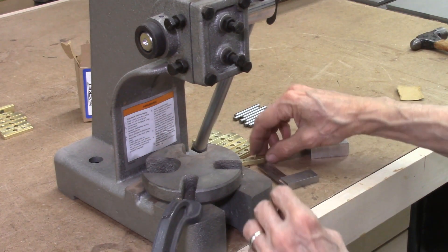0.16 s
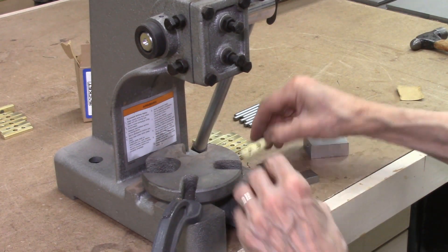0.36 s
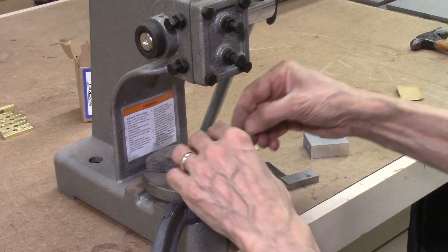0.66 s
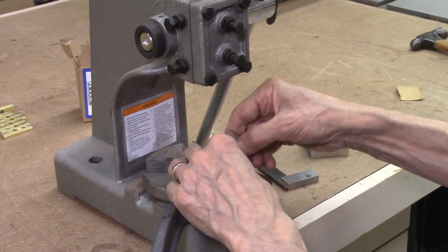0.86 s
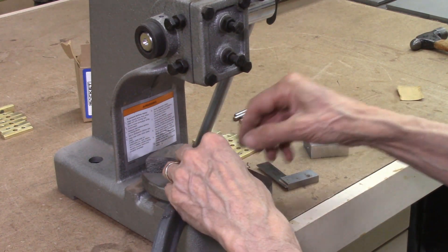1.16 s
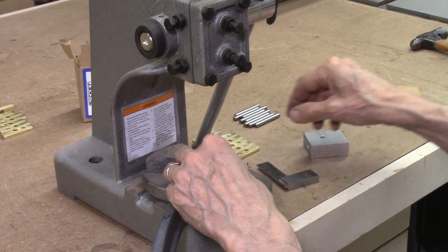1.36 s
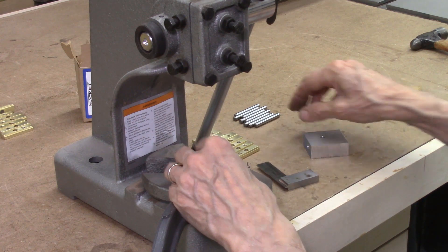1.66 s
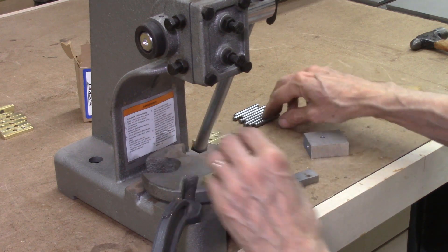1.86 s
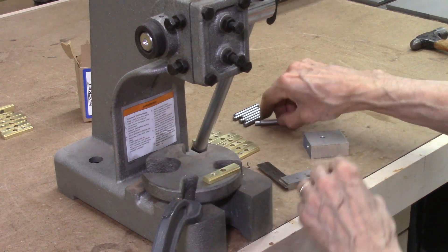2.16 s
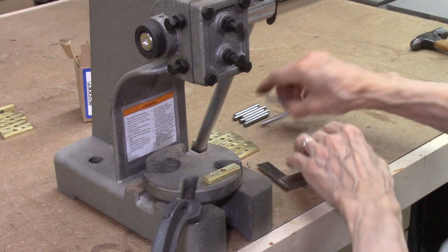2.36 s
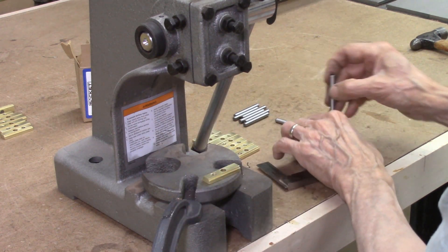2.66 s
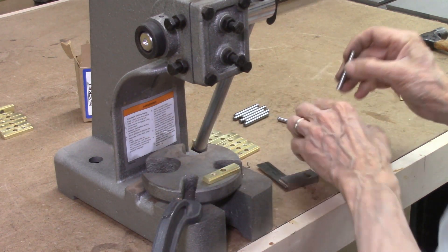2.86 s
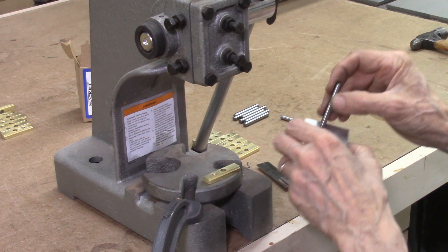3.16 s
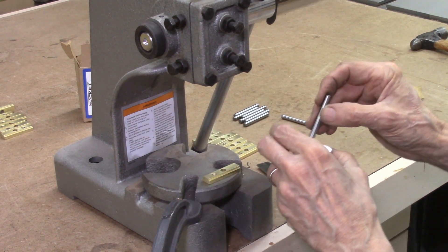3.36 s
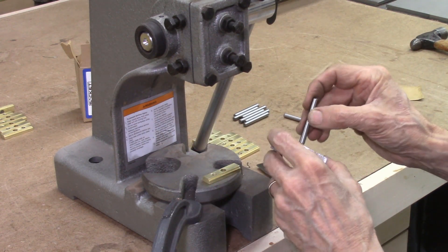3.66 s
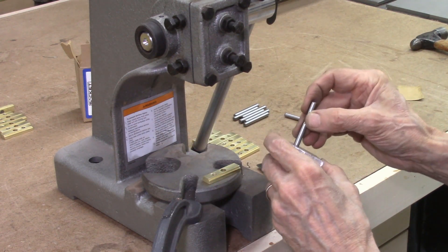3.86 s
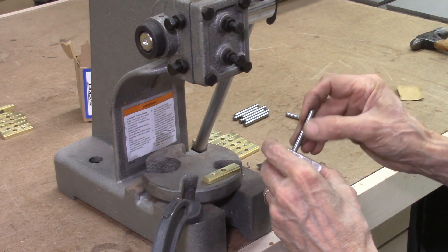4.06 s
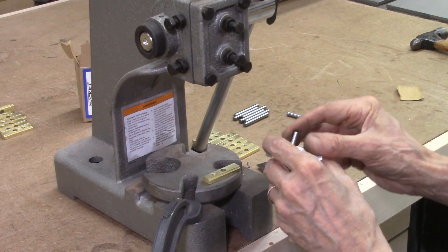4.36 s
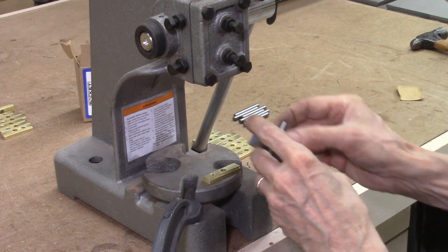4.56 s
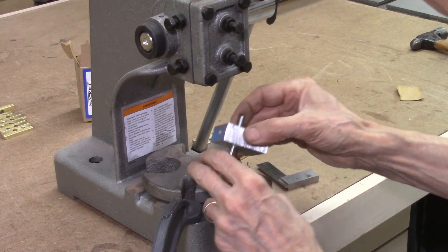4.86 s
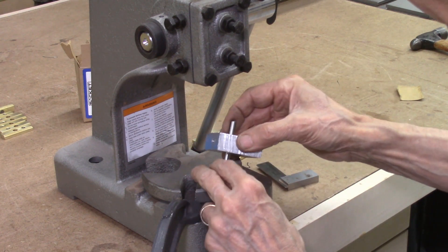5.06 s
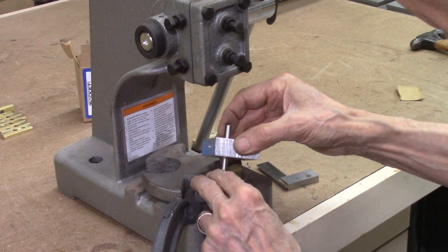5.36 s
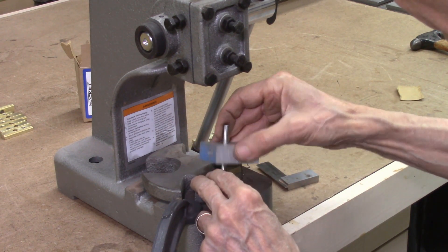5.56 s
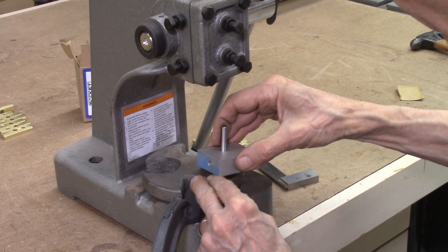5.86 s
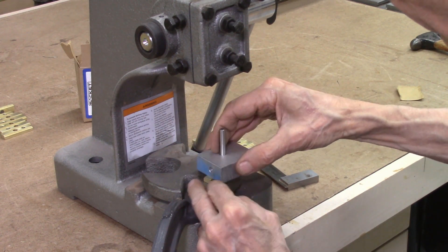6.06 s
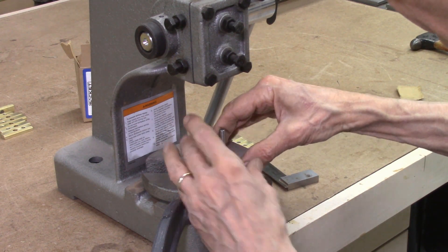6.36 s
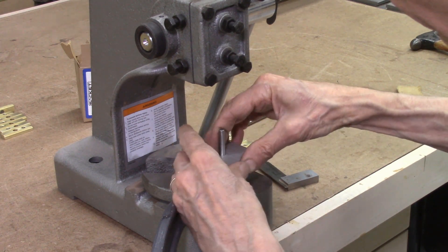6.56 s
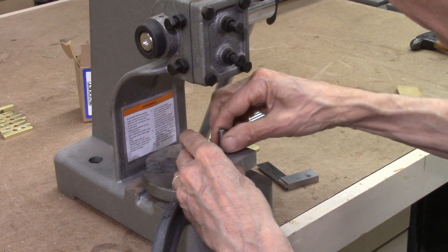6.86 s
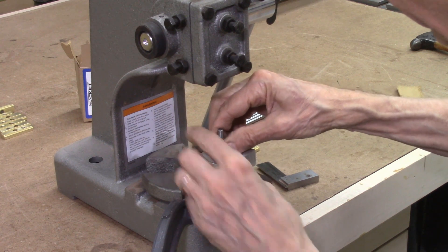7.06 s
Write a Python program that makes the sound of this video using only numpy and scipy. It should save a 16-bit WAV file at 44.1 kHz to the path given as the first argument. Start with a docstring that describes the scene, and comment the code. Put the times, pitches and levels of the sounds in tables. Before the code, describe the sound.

Close view of a workbench in a small, hard-walled shop. Parts knock and slide on wood, a light brass plate chatters sharply onto an iron press, and after a pause a short squeak and a loud block clatter follow. A steel pin then clicks, scrapes and seats in its hole; the block clacks onto the press. Low steady room noise and faint rapid ticking run beneath.

```python
"""A metal block clatters onto a wooden bench: crowded and clear modes struck by a tilted run of bounces.
A brass plate chatters on the anvil of an arbor press, parts knock and slide on the bench, a steel pin taps,
scrapes and seats, and the block is set on the press. Blows are shaped pulses, slides are bursts of tiny slips.
Squeaks and a high ring of the pin are wandering sines; steady filtered noise and a faint ticking mechanism
lie under a small hard room."""
import sys
import numpy as np
from scipy import signal
from scipy.fft import rfft, irfft
from scipy.io import wavfile

SR = 44100
rng = np.random.default_rng(int(sys.argv[2]) if len(sys.argv) > 2 else 0)


def output_pcm(signal):
    """Save a mono or channel-first signal as 16-bit PCM at the path in sys.argv[1].

    Samples are clipped to [-1, 1] before scaling.
    """
    pcm = np.clip(np.atleast_2d(signal).T, -1, 1) * 32767
    wavfile.write(sys.argv[1], SR, np.round(pcm).astype(np.int16))


N = 318402  # samples


def amp(db):
    """Decibels to gain."""
    return 10 ** (np.asarray(db) / 20)


def read(points, hz):
    """Interpolates (freq_hz, value) rows linearly on a log-frequency axis."""
    freq_hz, value = np.transpose(points)
    return np.interp(np.log(hz + 1), np.log(freq_hz), value)


def unit(x):
    """Scales to energy 1."""
    return x / np.sqrt(np.sum(x ** 2) + 1e-20)


def add(mix, start_s, sound):
    """Mixes a sound in at start_s, trimmed to the mix."""
    start = round(start_s * SR)
    sound = sound[..., max(-start, 0):]
    part = mix[..., max(start, 0):][..., :sound.shape[-1]]
    part += sound[..., :part.shape[-1]]


def low_cut(x, hz):
    """Second-order high-pass at hz."""
    return signal.sosfilt(signal.butter(2, hz, "highpass", fs=SR, output="sos"), x)


def causal(db_at, size=2048):
    """Minimum-phase pulse with the spectrum db_at(hz)."""
    hz = abs(np.fft.fftfreq(size, 1 / SR))
    log_gain = np.log(amp(db_at(hz)))
    spectrum = np.exp(np.conj(signal.hilbert(log_gain)))
    return np.fft.ifft(spectrum).real[:size // 2]


def contact(bright_db_per_oct, weight_db):
    """Force of one touch: hard edges tilt it to the treble, mass behind it adds bass."""
    def spectrum_db(hz):
        octaves = np.log2(np.clip(hz, 400, 10000) / 1500)
        return bright_db_per_oct * octaves + weight_db / (1 + (hz / 600) ** 4)
    return causal(spectrum_db)


def ring(modes, t):
    """Dying sines; a random sign stands for the spot struck."""
    out = 0
    for freq_hz, level_db, t60_s in modes:
        decay = amp(level_db - 60 * t / t60_s)
        out = out + rng.choice([-1, 1]) * decay * np.sin(2 * np.pi * freq_hz * t)
    return out


def body(colour, modes, dense_t60_s, dense_share):
    """Response to a tap: a tick, a short wash of crowded modes, and a few clear modes."""
    t = np.arange(SR // 3) / SR
    share = np.clip(dense_share, 0, 1)  # of the energy
    noise = rng.standard_normal(len(t)) * amp(-60 * t / dense_t60_s)
    wash = np.sqrt(share) * unit(noise)
    wash[0] += np.sqrt(1 - share)
    coloured = signal.fftconvolve(wash, causal(lambda hz: read(colour, hz)))
    return coloured[:len(t)] + ring(modes, t)


# wall reverberation: freq_hz, t60_s
ROOM_DECAY = [(100, 0.53), (400, 0.64), (1000, 0.52), (4000, 0.5), (8000, 0.43), (14000, 0.27)]
# stereo width of the reflections: freq_hz, side_over_mid_db
ROOM_WIDTH = [(100, -16), (500, -30), (2000, -17.5), (7000, -12.5), (14000, -17.5)]


def room(build_s=0.0057):
    """Mid and side reflections for one spot: they thicken, then die at a rate set per band."""
    hz = np.fft.rfftfreq(256, 1 / SR)
    t = np.arange(SR // 192) * 128 / SR
    z = rng.standard_normal((2, len(hz), len(t))) * amp(-60 * t / read(ROOM_DECAY, hz)[:, None])
    z = z * np.exp(2j * np.pi * rng.random(z.shape))
    z[1] *= amp(read(ROOM_WIDTH, hz))[:, None]
    tail = low_cut(signal.istft(z, SR)[1], hz=105)  # the shop holds no deep bass
    tail *= 1 - np.exp(-(np.arange(tail.shape[1]) / SR / build_s) ** 2)
    return tail / np.linalg.norm(tail[0])


# early echoes off the bench top and iron press: delay_s, gain
ECHOES = [(.0012, 0.21), (.0045, 0.17), (0.0113, .12), (0.017, 0.11)]


def heard(sound, room_db):
    """A sound at its own spot, as mid and side: direct, near echoes, then the walls."""
    out = amp(room_db) * signal.fftconvolve(sound[None], room())
    add(out[0], 0.00025, sound)
    for delay_s, gain in ECHOES:
        add(out[0], delay_s, gain * sound)
    return out


def slip_force(t, length_s, slips_per_s, spread_db):
    """Sliding force: a swell of tiny slips of uneven size, at energy 1."""
    slips = (rng.random(len(t)) < slips_per_s / SR) * rng.choice([-1, 1], len(t))
    slips = slips * amp(spread_db * np.minimum(rng.exponential(1, len(t)), 4))
    return unit(slips * np.exp(-(2 * t / length_s) ** 2))


def handle(blows, strokes, colour, modes, dense_t60_s, dense_share, room_db=0, low_hz=150,
           slips_per_s=1500, spread_db=4):
    """Blows and strokes on one thing, as mid and side; light things radiate little below low_hz."""
    out = np.zeros((2, N))
    for start_s, force_db, bright, weight_db, wet_db in blows:
        # each blow lands on another spot: fresh crowded modes
        response = body(colour, modes, dense_t60_s, dense_share)
        sound = signal.fftconvolve(response, contact(bright, weight_db))
        add(out, start_s, amp(force_db) * heard(sound, room_db + wet_db))
    t = np.arange(-SR // 8, SR // 8) / SR
    for middle_s, length_s, force_db, bright in strokes:
        slips = slip_force(t, length_s, slips_per_s, spread_db)
        force = signal.fftconvolve(slips, contact(bright, 0))
        sound = signal.fftconvolve(force, body(colour, modes, dense_t60_s, dense_share))
        add(out, middle_s + t[0], amp(force_db) * heard(sound, room_db))
    return low_cut(out, low_hz)


def touch(start_s, force_db, bright_db_per_oct=0, weight_db=0, wet_db=0, thud_per_db=0, wet_per_db=0):
    """One blow row; with the per_db terms, fingers give lighter touches more thud and room."""
    weight_db = weight_db - thud_per_db * force_db
    wet_db = wet_db - wet_per_db * force_db
    return start_s, force_db, bright_db_per_oct, weight_db, wet_db


def bounces(landing, gap_s, loss_db, dulling_db_per_oct, count):
    """A part let go hits several times, each time weaker and duller."""
    start_s, force_db, bright = landing
    return [(start_s + k * gap_s, force_db - k * loss_db, bright - k * dulling_db_per_oct)
            for k in range(count)]


def rubs(rows, bright_db_per_oct):
    """Strokes over one surface share its brightness."""
    return [(middle_s, length_s, force_db, bright_db_per_oct) for middle_s, length_s, force_db in rows]


# shop noise spectrum, relative: freq_hz, density_db_per_hz
HUSH = [(15, -38.5), (25, -25.5), (149, -2), (185, 0.5), (285, 1), (427, 1), (476, -2.5), (531, -2.5),
        (695, -4), (1100, -7.5), (1190, -7.5), (2000, -11), (2760, -13), (14000, -25.5), (16000, -41.5)]
# shop noise width: freq_hz, side_over_mid_db
HUSH_SIDE = [(60, -1), (180, -5), (550, -4), (1650, -5), (4970, -7.5), (15000, -13.5)]
HUSH_DB = -53.5  # mid RMS


def hush():
    """Steady shop noise, Gaussian and spectrally shaped, as mid and side."""
    hz = np.fft.rfftfreq(N, 1 / SR)
    z = rfft(rng.standard_normal((2, N))) * amp(read(HUSH, hz))
    mid = irfft(z[0], N)
    side = irfft(z[1] * amp(read(HUSH_SIDE, hz)), N)
    return amp(HUSH_DB) * np.array([mid, side]) / mid.std()


# modes of the ticking mechanism: freq_hz, level_db, t60_s
TICKER_MODES = [(1299, -51.5, 0.0095), (1890, -50, 0.013), (2400, -60.5, .015), (4080, -62, 0.0084)]
TICKER_HZ = 14.985


def ticker(first_s=0.0088, spread_db=4):
    """A small mechanism ticks faintly: modes rung evenly in time, unevenly in strength."""
    out, t = np.zeros(N), np.arange(SR // 20) / SR
    for start_s in np.arange(first_s, N / SR, 1 / TICKER_HZ):
        strength_db = spread_db * np.clip(rng.standard_normal(), -2, 2)
        add(out, start_s, amp(strength_db) * ring(TICKER_MODES, t))
    return out


# pitched tones: squeaks of dragged metal, and the pin's high ring at 11 kHz
# middle_s, length_s, pitch_hz, width_hz, level_db (before room, low cut)
PITCHED_TONES = [(1.947, 0.04, 663.5, 44.9, -25), (2.151, 0.013, 7800, 245, -46),
                 (2.418, 0.049, 11020, 91, -49.5), (3.258, .025, 665, 50, -45),
                 (5.574, 0.037, 3533, 300, -51), (5.576, 0.038, 9350, 500, -53.5),
                 (6.685, 0.041, 482, 39.8, -46)]


def pitched_tones():
    """Squeaks of dragged metal and the pin's high ring: sines of wandering phase that swell and fade."""
    out, t = np.zeros((2, N)), np.arange(-SR // 8, SR // 8) / SR
    for middle_s, length_s, pitch_hz, width_hz, level_db in PITCHED_TONES:
        wander = np.cumsum(rng.standard_normal(len(t))) * np.sqrt(2 * np.pi * abs(width_hz) / SR)
        swell = amp(level_db) * np.exp(-(2 * t / length_s) ** 2)
        tone = swell * np.sin(2 * np.pi * pitch_hz * t + wander)
        add(out, middle_s + t[0], heard(tone, room_db=-6.5))
    return low_cut(out, hz=262)


# finger-held pin dropping home in its hole: start_s, force_db
SEATING_TICKS = [(4.0784, -2.5), (4.21, -17.5), (6.223, -20.5)]
# skin sliding over a part: middle_s, length_s, force_db
FINGER_RUBS = [(.541, 0.053, -13.5), (.67, 0.1, -17), (4.071, 0.015, -5), (4.23, 0.16, -14.5),
               (5.225, .014, -17.5)]
# parts dragged over the bench, also played by bench(): middle_s, length_s, force_db, dry_surface_hiss_db
BENCH_SLIDES = [(.01, .068, -7, -1.5), (.211, .028, -13.5, -14), (1.86, .012, -11.5, -0.5),
                (1.922, .07, -0.5, 1.5), (2.236, .13, -13, -12), (2.39, 0.19, -5, -29.5)]
# dense response of held parts: freq_hz, level_db
SEATING_COLOUR = [(300, -4.5), (1200, -9), (3500, -11.5), (5500, -8), (7200, -8), (8800, -10.5),
                  (10500, -13.5), (12000, -19), (16000, -30.5)]
# clear modes of held parts: freq_hz, level_db, t60_s
SEATING_MODES = [(7030, -41.5, 0.023), (8240, -41, 0.011)]


def held_parts():
    """Parts damped by the fingers only tick and hiss, against skin or the bench."""
    blows = [touch(*row, wet_db=-11, wet_per_db=0.85) for row in SEATING_TICKS]
    hiss = [(middle_s, length_s, hiss_db) for middle_s, length_s, _, hiss_db in BENCH_SLIDES]
    strokes = rubs(hiss, bright_db_per_oct=-1.25) + rubs(FINGER_RUBS, bright_db_per_oct=0.64)
    return handle(blows, strokes, SEATING_COLOUR, SEATING_MODES, dense_t60_s=0.00997, dense_share=0.17,
                  room_db=-0.5, slips_per_s=4400, spread_db=6.5)


# pin tapping the block as it seeks the hole: start_s, force_db
PIN_TICKS = [(3.0675, -2.5), (3.557, -31.5), (3.853, -12)]
# pin scraping on metal: middle_s, length_s, force_db
PIN_RUBS = [(2.372, 0.061, 1.5), (3.24, 0.034, -9.5), (3.44, 0.07, -10.5), (3.57, 0.051, -12),
            (3.741, .032, -15), (3.842, 0.039, -11)]
# dense response of the pin: freq_hz, level_db
PIN_COLOUR = [(200, -17), (700, -10.5), (1500, 2), (2600, 2), (4500, 1.5), (8000, -2.5), (11000, -2.5),
              (12500, -30), (16000, -20)]
# clear modes of the pin: freq_hz, level_db, t60_s
PIN_MODES = [(10800, -38, 0.064), (10840, -36, 0.096), (10980, -31, .11), (10900, -40, .06)]


def pin():
    """A loosely held steel pin rings high when it taps and scrapes."""
    blows = [touch(*row, weight_db=1.0, wet_db=-3.0) for row in PIN_TICKS]
    strokes = rubs(PIN_RUBS, bright_db_per_oct=-6.0)
    return handle(blows, strokes, PIN_COLOUR, PIN_MODES, dense_t60_s=0.014, dense_share=0.32,
                  room_db=-3.5, slips_per_s=650, spread_db=1.5)


# block and hands touching the anvil: start_s, force_db, bright_db_per_oct
ANVIL_KNOCKS = [(5.09, -19, 0), (5.6008, 1.5, 2), (6.033, -7.5, 6), (6.675, -31.5, -13), (6.888, -16.5, -7),
                (6.972, -18, -3)]
# block shifted on the anvil: middle_s, length_s, force_db
ANVIL_SLIDES = [(5.349, 0.13, -14), (5.58, 0.098, -12.5), (5.941, 0.055, -18), (6.941, 0.086, -20.5)]
# dense response of the press: freq_hz, level_db
ANVIL_COLOUR = [(100, -20), (270, 5), (520, 9.5), (850, 1), (1350, 10), (2300, -3.5), (3600, -4),
                (5300, -8), (7000, -15.5), (9000, -18.5), (14000, -36)]
# clear modes of the press: freq_hz, level_db, t60_s
ANVIL_MODES = [(253, -45, 0.16), (535, -34.5, 0.066), (1197, -34, 0.038), (1342, -38.5, 0.032),
               (3270, -53, 0.029), (5430, -47, 0.04)]
THUD_DELAY_S, THUD_DB = 0.001313, -14  # force passed on to the bench, re the click


def anvil():
    """The iron press clicks dryly; its mass then thuds into the bench, which fills the room."""
    clicks = [touch(*row, weight_db=-6.0, wet_db=-5.5) for row in ANVIL_KNOCKS]
    thuds = [touch(start_s + THUD_DELAY_S, force_db + THUD_DB, bright_db_per_oct=-3.5, weight_db=1.3, wet_db=9)
             for start_s, force_db, _ in ANVIL_KNOCKS]
    strokes = rubs(ANVIL_SLIDES, bright_db_per_oct=-0.6)
    return handle(clicks + thuds, strokes, ANVIL_COLOUR, ANVIL_MODES, dense_t60_s=0.022, dense_share=0.69,
                  room_db=-0.84, slips_per_s=290, spread_db=2.0)


# parts touching the bench: start_s, force_db, bright_db_per_oct
BENCH_KNOCKS = [(0.1058, -11, -4), (.197, -17.5, -2.5), (.2488, 0.5, -1.5), (.2673, 5.5, -0.6),
                (.467, -23, 1.5), (1.8185, -14.5, 0.9), (1.855, -5.5, -3.5), (1.939, -4.5, -1),
                (2.3886, -13.5, -4), (2.4155, -7.5, 1)]
# dense response of the bench: freq_hz, level_db
BENCH_COLOUR = [(100, -9.5), (250, -1), (450, 9), (680, 11.5), (850, 7), (1250, 8.5), (1800, 4),
                (2500, -0.5), (3600, -6), (5000, -13.5), (9000, -19.5), (14000, -35.5)]
# clear modes of the bench: freq_hz, level_db, t60_s
BENCH_MODES = [(655, -28.5, 0.047), (923, -43, 0.13), (1306, -52.5, .05), (1342, -39, 0.0654),
               (2250, -42, 0.013)]


def bench():
    """The wooden top answers the parts knocked and dragged on it."""
    blows = [touch(*row, weight_db=-7, thud_per_db=0.7542, wet_per_db=0.3232) for row in BENCH_KNOCKS]
    drags = [(middle_s, length_s, force_db) for middle_s, length_s, force_db, _ in BENCH_SLIDES]
    strokes = rubs(drags, bright_db_per_oct=1.0)
    return handle(blows, strokes, BENCH_COLOUR, BENCH_MODES, dense_t60_s=0.0725, dense_share=0.49,
                  room_db=-1.3, low_hz=210.6, slips_per_s=590, spread_db=1.5)


# plate grazing the anvil: start_s, force_db, bright_db_per_oct
BRASS_GRAZE = (.8456, -6.5, -3)
# plate let go on the anvil, first hit: start_s, force_db, bright_db_per_oct
BRASS_LANDING = (1.0497, 2.16, 2.75)
# dense response of the plate: freq_hz, level_db
BRASS_COLOUR = [(150, -16), (400, 10.5), (900, 11.5), (1400, 17.5), (2150, 3.5), (3000, 7.5), (4200, 0),
                (6800, 7), (8500, -5), (12000, -7.5), (16000, -21)]
# clear modes of the plate: freq_hz, level_db, t60_s
BRASS_MODES = [(533, -26, 0.074), (905, -31.5, 0.14), (1234, -34, 0.099), (1375, -36, 0.24),
               (1780, -41, 0.33), (2430, -30, 0.034), (2860, -36, 0.052), (2920, -24.5, 0.054),
               (3050, -36, 0.066), (3230, -31, 0.071), (3400, -37, 0.1), (3830, -44, 0.12),
               (5380, -41, 0.075), (5780, -32, 0.066), (6330, -40, 0.087), (6930, -21.5, 0.019),
               (7220, -37, 0.056), (7200, -41, 0.077), (13750, -45, 0.11)]


def brass():
    """The light plate grazes the anvil, then chatters to rest on it."""
    chatter = bounces(BRASS_LANDING, gap_s=0.0043, loss_db=4.0, dulling_db_per_oct=3.5, count=3)
    blows = [touch(*BRASS_GRAZE, weight_db=-21.5, wet_db=1.0)]
    blows += [touch(*hit, weight_db=-2.5, wet_db=-1.3) for hit in chatter]
    return handle(blows, [], BRASS_COLOUR, BRASS_MODES, dense_t60_s=0.028, dense_share=0.92,
                  room_db=-2.84, low_hz=230)


# block hitting the bench, first hit: start_s, force_db, bright_db_per_oct
BLOCK_LANDING = (2.4668, 1.7, 0.88)
# dense response of the block: freq_hz, level_db
BLOCK_COLOUR = [(35, 0), (100, 6), (220, 8.5), (420, 23.5), (850, 23.5), (1500, 21), (2700, 20.5),
                (4500, 16.5), (8000, 17), (10000, 14), (13000, 2), (16000, -8)]
# clear modes of the block: freq_hz, level_db, t60_s
BLOCK_MODES = [(304.3, -43, .35), (654, -19, 0.12), (941, -23.5, 0.22), (2295, -38, 0.11),
               (2576, -37, 0.33), (2760, -37, 0.089), (6970, -31, 0.055)]
# far edge of the tilted block, re the near edge
FAR_EDGE_DELAY_S, FAR_EDGE_DB, FAR_EDGE_DB_PER_OCT = 0.0056, -5.5, -0.5


def block():
    """The heavy block rocks on the bench, edge after edge, until its last bounce lands flat."""
    near = bounces(BLOCK_LANDING, gap_s=0.0155, loss_db=2.0, dulling_db_per_oct=0.55, count=3)
    far = [(start_s + FAR_EDGE_DELAY_S, force_db + FAR_EDGE_DB, bright + FAR_EDGE_DB_PER_OCT)
           for start_s, force_db, bright in near[:-1]]
    blows = [touch(*hit, weight_db=1.5, wet_db=0.1) for hit in near + far]
    return handle(blows, [], BLOCK_COLOUR, BLOCK_MODES, dense_t60_s=0.074, dense_share=0.86,
                  room_db=-1.03, low_hz=45)


def scene():
    """Sums all sources in mid and side, the ticker in mid only; returns left and right."""
    background = hush() + pitched_tones()
    parts = held_parts() + pin() + anvil() + bench() + brass() + block()
    mid, side = background + parts
    mid = mid + ticker()
    return np.array([mid + side, mid - side])


EDGE_HZ = 15700


def record(dry):
    """Peaks clip at full scale; then a low-pass at EDGE_HZ."""
    clipped = np.clip(dry, -1, 1)
    low_pass = signal.firwin(255, EDGE_HZ, window=("kaiser", 8), fs=SR)
    return signal.oaconvolve(clipped, low_pass[None], "same")


dry = scene()
out = record(dry)
output_pcm(out)
```